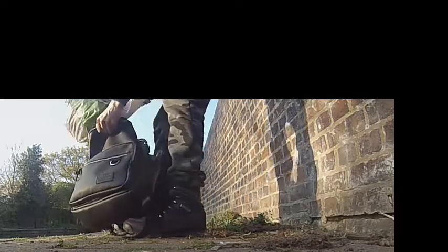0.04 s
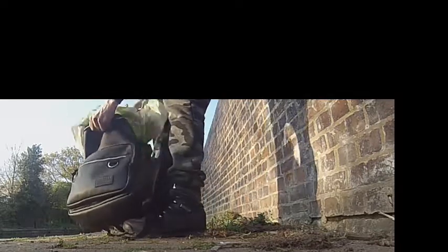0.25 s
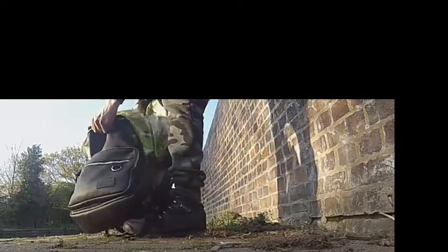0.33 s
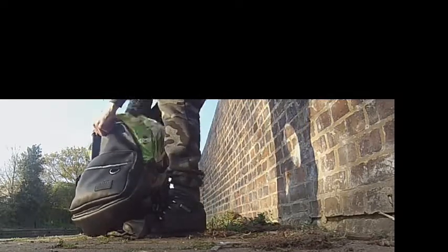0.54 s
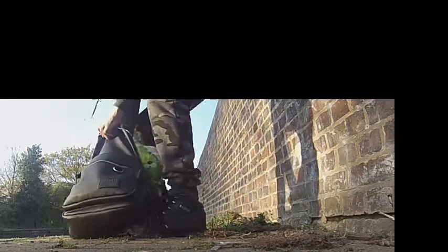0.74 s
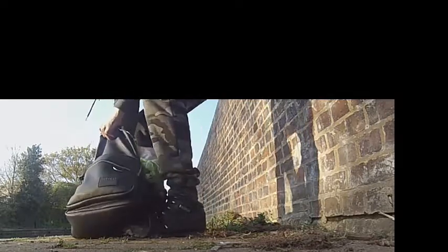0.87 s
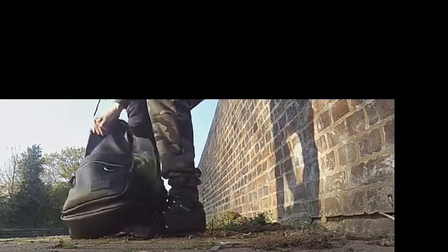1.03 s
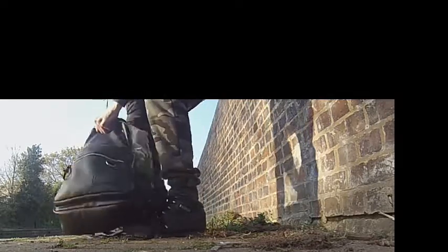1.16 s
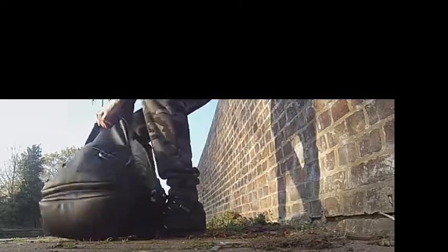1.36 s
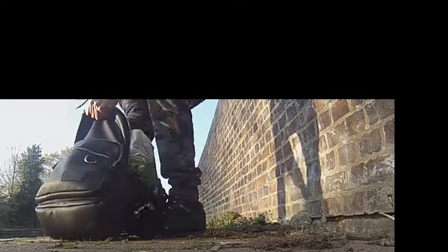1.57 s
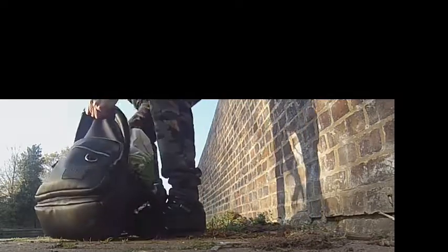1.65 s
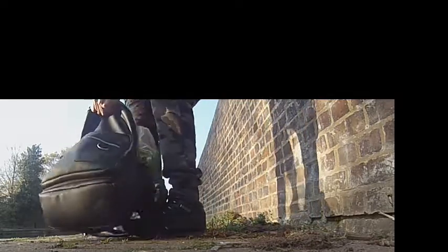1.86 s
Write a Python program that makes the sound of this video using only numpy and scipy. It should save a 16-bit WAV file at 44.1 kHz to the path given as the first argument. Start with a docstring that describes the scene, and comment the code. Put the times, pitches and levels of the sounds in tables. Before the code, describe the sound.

Crinkly thin cloth is stuffed into a bag on the ground, dry and close. Rough scraping swells early, peaks before one second, returns in shorter bouts with a stutter and small pops, then fades over faint outdoor noise.

```python
"""Outdoors, on the ground: a thin crinkly cover is stuffed into a fabric bag close to a small microphone.
Panel flexing (stick-slip pulses), weave scraping (ringing grains) and film crinkling (bursty hiss)
are shaped noises that follow one handling curve. Creases snap, a metal zip tab jingles, hollow pops
and dull knocks ring as dying sines, a seam judders to a stop; far outdoor noise lies under it."""
import sys
import numpy as np
from scipy import signal
from scipy.io import wavfile
from scipy.ndimage import uniform_filter1d

SR = 44100
rng = np.random.default_rng(int(sys.argv[2]) if len(sys.argv) > 2 else 0)


def master(y):
    """Save y as 16-bit WAV."""
    cut = np.clip(np.atleast_2d(y).T, -1, 1)
    pcm = np.round(cut * 32767)  # scale
    wavfile.write(sys.argv[1], SR, pcm.astype(np.int16))


def voltage_ratio(decibels):
    """Convert decibels (scalar or array-like) to amplitude ratios, 20 dB per decade."""
    exponent = np.asarray(decibels, float) / 20
    return 10 ** exponent


N = 83790  # length in samples

# Handling effort: (time [s], panel flexing level [dB], weave scraping level [dB], film crinkling level [dB])
HANDLING_CURVE = [(0, -42.5, -46.5, -53), (0.193, -52, -46.5, -78), (0.208, -33.5, -38.5, -45),
                  (0.259, -35.5, -38.5, -48), (0.282, -26.5, -24, -30), (0.327, -25.5, -24.5, -29.5),
                  (0.36, -29, -29.5, -31), (0.41, -33, -30.5, -33.5), (0.47, -35.5, -33.5, -41),
                  (0.55, -33, -31.5, -40.5), (0.6, -27, -25.5, -37), (0.629, -21, -22, -32),
                  (0.679, -19, -28, -37), (0.71, -27, -26.5, -38), (0.746, -22.5, -22.5, -35),
                  (0.76, -27, -28, -35.5), (0.795, -24, -27, -40), (0.805, -22, -30, -41.4),
                  (0.859, -20.5, -22.5, -36), (0.916, -23, -28, -39.5), (0.936, -36.5, -33, -42),
                  (0.985, -33.5, -38.5, -55), (1.02, -31, -34, -43), (1.1, -29.5, -27, -38),
                  (1.139, -30, -27.5, -36.5), (1.168, -33.5, -37, -49), (1.199, -28.5, -30.5, -41.5),
                  (1.29, -27.5, -27.5, -34), (1.32, -23, -25.5, -33), (1.377, -26, -27, -35),
                  (1.395, -37.5, -34, -40), (1.531, -37.5, -37, -53), (1.568, -30.5, -30.5, -43),
                  (1.59, -35, -37, -48.5), (1.64, -41, -39.5, -50), (1.665, -47, -49, -56),
                  (1.76, -50.5, -48.5, -62), (1.9, -43.5, -52, -76)]
# Spectrum of the flexing panels: (frequency [Hz], relative level per hertz [dB])
PANEL_SPECTRUM = [(35, -62), (60, -15.5), (108, -6.5), (190, -7.5), (389, -0.5), (740, -3), (1460, -11),
                  (2200, -19), (2860, -56.5)]
# Spectrum of the scraping weave: (frequency [Hz], relative level per hertz [dB])
WEAVE_SPECTRUM = [(650, -34), (1100, -3), (2470, -1.5), (3450, -3), (7040, -5), (9000, -12.5), (11700, -78)]
# Spectrum of the crinkling film: (frequency [Hz], relative level per hertz [dB])
FILM_SPECTRUM = [(4410, -21.5), (7500, -8), (9240, -9), (15300, -12.5)]
# Sharp creases snapping: (time [s], level [dB], centre frequency [Hz])
CREASE_SNAPS = [(0.052, -30, 6060), (.131, -33, 8500), (.237, -23, 8000), (.2955, -13, 4700),
                (0.6062, -14.5, 10500), (.7005, -12, 4870), (.735, -11, 4200), (0.745, -15, 6500),
                (0.75, -10, 5600), (0.8534, -5, 6400), (1.049, -22.5, 8900), (1.103, -21.5, 6000),
                (1.552, -21.5, 6900), (1.703, -33.5, 3000), (1.740, -32.5, 7000), (1.789, -28, 4950),
                (1.802, -40, 4300), (1.826, -30, 6060)]
# Zip tab tapping: (time [s], level [dB], lift of the upper modes [dB])
TAB_TAPS = [(0.07, -34, -4), (0.079, -27.5, 2), (.119, -30.5, -8), (0.124, -30, -1), (0.231, -25.5, 9),
            (.246, -29.5, 4), (1.442, -29, 10), (1.456, -25, 10), (1.468, -29.5, 16.5), (1.48, -23.5, 7.5),
            (1.499, -35, 16)]
# Modes of the zip tab: (nominal frequency [Hz], nominal level [dB], t60 [s])
TAB_MODES = [(4200, 4.5, .011), (5980, 0.5, 0.0057), (6800, -6, 0.008), (7800, -10.5, 0.0072)]
# Short hollow pops: (time [s], level [dB], frequency [Hz])
HOLLOW_POPS = [(1.432, -18, 2260), (1.484, -11.5, 2180)]
# Dull knocks and folds of the bag: (time [s], level [dB], frequency [Hz], time to fall 60 dB [cycles])
BAG_KNOCKS = [(.205, -20, 850, 16), (.270, -16.5, 430, 22), (.329, -13, 450, 6), (.739, -10, 520, 3),
              (.8005, -5, 500, 3), (1.3095, -8, 800, 12), (1.562, -15, 1200, 6), (1.7745, -15, 700, 4),
              (1.781, -21, 600, 3)]
# Spectrum of the far outdoor noise: (frequency [Hz], relative level per hertz [dB])
WASH_SPECTRUM = [(15, -57), (25, 2.5), (86, 8), (383, -2.5), (856, 4.5), (3540, -28), (15000, -29)]

WASH_DB = -41
STICK_PER_S = 210  # nominal pace at which the panels stick and let go
SNAP_T60_CYCLES, SNAP_SCATTER_T60_S = 19, 0.01
JUDDER_START_S, JUDDER_GAP_S, JUDDER_GAP_RATIO = 1.3527, 0.0054, 1.23
JUDDER_DB, JUDDER_HZ = -8, 1400
LEFT_CUT_HZ, EDGE_HZ = 78, 15600
HIT_T_S = np.arange(3000) / SR  # time axis of one hit


def evened(x):
    """Scale to unit rms."""
    return x / np.sqrt(np.mean(x ** 2) + 1e-20)


def colour(x, points):
    """Minimum-phase filter with the given spectrum, floored at -70 dB."""
    hz, db = np.transpose(points)
    bin_hz = abs(np.fft.fftfreq(8192, 1 / SR))
    gain_db = np.interp(np.log(bin_hz + 1), np.log(hz + 1), np.maximum(db, -70))
    log_gain = np.log(voltage_ratio(gain_db))
    phase = -signal.hilbert(log_gain).imag
    taps = np.fft.ifft(np.exp(log_gain + 1j * phase)).real[:4096]
    return signal.oaconvolve(x, taps)[:N]


def add(mix, start_s, sound):
    """Add a sound into the mix in place, cut at its end."""
    part = mix[round(start_s * SR):][:len(sound)]
    part += sound[:len(part)]


def handling_gain(column):
    """Gain from one column of the handling curve."""
    rows = np.array(HANDLING_CURVE)
    return voltage_ratio(np.interp(np.arange(N) / SR, rows[:, 0], rows[:, column]))


def slips(per_s, spread_db):
    """Random train of slips, mostly small, a few large."""
    size_db = spread_db * np.minimum(rng.exponential(1, N), 4)
    return voltage_ratio(size_db) * (rng.random(N) < per_s / SR)


def grains(train, lo_hz, hi_hz, cycles, count=24):
    """Each slip rings one of many small patches, each with its own pitch; cycles = decay to 1/e."""
    patch = rng.integers(0, count, N)
    out = np.zeros(N)
    for k, hz in enumerate(np.geomspace(lo_hz, hi_hz, count)):
        turns = np.arange(0, 4 * cycles, hz / SR)
        grain = np.cos(2 * np.pi * turns) * np.exp(-turns / cycles)
        out += signal.oaconvolve(train * (patch == k), grain / np.linalg.norm(grain))[:N]
    return evened(out)


def flutter(smooth_s, depth_db):
    """Random gain from twice-smoothed noise; depth_db is its rms swing."""
    width = int(smooth_s * SR) + 1
    drift = uniform_filter1d(rng.standard_normal(N), width)
    drift = uniform_filter1d(drift, width)
    return voltage_ratio(depth_db * evened(drift))


def ring(hz, t60_s, rise_s):
    """Dying sine with a soft start."""
    decay = voltage_ratio(-60 * HIT_T_S / t60_s)
    return np.sin(2 * np.pi * hz * HIT_T_S) * decay * np.minimum(HIT_T_S / rise_s, 1)


def panel_flexing(jolt, hiss):
    """Stick-slip: one pulse of random size per turn of an unsteady clock, plus jolts and hiss."""
    turns = np.cumsum(STICK_PER_S * flutter(smooth_s=0.004, depth_db=3.5)) / SR
    push = np.diff(np.floor(turns), prepend=0) * voltage_ratio(2.33 * rng.standard_normal(N))
    return evened(push - push.mean()) + 0.15 * jolt + 0.7 * hiss


def weave_scraping(jolt, hiss):
    """Dense slips ring small patches of weave, plus jolts and hiss."""
    scrape = grains(slips(per_s=2200, spread_db=2.4), lo_hz=1200, hi_hz=8000, cycles=1.6)
    return scrape + 0.25 * jolt + 0.55 * hiss


def film_crinkling(shared, jolt, hiss):
    """Hiss that bursts at each shared slip and dies away (0.95 ms to 1/e), plus jolts."""
    burst = evened(signal.lfilter([1], [1, -np.exp(-1 / (0.00095 * SR))], shared))
    return 0.26 * jolt + (1 + 0.5 * burst) * hiss


def cloth():
    """Three textures share the slips and the flutter of the contact pressure."""
    shared = slips(per_s=200, spread_db=3.0)
    pressure = flutter(smooth_s=0.0048, depth_db=1.1)
    panel_hiss, weave_hiss, film_hiss = rng.standard_normal((3, N))
    jolt = evened(shared - shared.mean())
    panel = evened(pressure * colour(panel_flexing(jolt, panel_hiss), PANEL_SPECTRUM))
    weave = evened(pressure * colour(weave_scraping(jolt, weave_hiss), WEAVE_SPECTRUM))
    film = evened(pressure * colour(film_crinkling(shared, jolt, film_hiss), FILM_SPECTRUM))
    return handling_gain(1) * panel + handling_gain(2) * weave + handling_gain(3) * film


def snaps():
    """Each crease rings briefly at its pitch under a dying noise band, mostly below that pitch."""
    out = np.zeros(N)
    for start_s, db, hz in CREASE_SNAPS:
        band = signal.butter(1, [0.27 * hz, min(1.03 * hz, 15500)], "band", fs=SR)
        noise = signal.lfilter(*band, rng.standard_normal(len(HIT_T_S)))
        scatter = evened(noise) * voltage_ratio(-60 * HIT_T_S / SNAP_SCATTER_T60_S)
        tone = ring(hz, SNAP_T60_CYCLES / hz, rise_s=0.0001)
        add(out, start_s, voltage_ratio(db) * (1.13 * tone + 0.5 * scatter))
    return out


def zip_tab():
    """Each tap is a brief rattle of bounces that excites the metal modes, slightly varied."""
    out = np.zeros(N)
    bounce = np.arange(400)  # samples
    for start_s, db, lift_db in TAB_TAPS:
        level_shift, pitch_shift = rng.standard_normal((2, len(TAB_MODES)))
        modes = np.zeros(len(HIT_T_S))
        for k, (hz, mode_db, t60_s) in enumerate(TAB_MODES):
            tap_db = mode_db + lift_db * (k > 0) + 1.5 * level_shift[k]
            tap_hz = hz * (1 + 0.014 * pitch_shift[k])
            modes += voltage_ratio(tap_db) * ring(tap_hz, t60_s, rise_s=0.00037)
        rattle = rng.standard_normal(len(bounce)) * np.exp(-bounce / (0.003 * SR))
        add(out, start_s, voltage_ratio(db) * np.convolve(modes, rattle / np.linalg.norm(rattle)))
    return out


def pops():
    """Hollow pops: short soft-edged sines."""
    out = np.zeros(N)
    for start_s, db, hz in HOLLOW_POPS:
        add(out, start_s, voltage_ratio(db) * ring(hz, t60_s=0.013, rise_s=0.00085))
    return out


def knocks():
    """Knocks and folds: low dying sines that swing negative first."""
    out = np.zeros(N)
    for start_s, db, hz, cycles in BAG_KNOCKS:
        add(out, start_s, -voltage_ratio(db) * ring(hz, cycles / hz, rise_s=0.3 / hz))
    return out


def judder(count=5):
    """A seam stops in a few hard, short slips, each gap longer than the last."""
    out = np.zeros(N)
    slip = voltage_ratio(JUDDER_DB) * ring(JUDDER_HZ, 3 / JUDDER_HZ, rise_s=0.0001)
    for k in range(count):
        late_s = JUDDER_GAP_S * (JUDDER_GAP_RATIO ** k - 1) / (JUDDER_GAP_RATIO - 1)
        add(out, JUDDER_START_S + late_s, slip)
    return out


def scattered(near):
    """Short scatter from the wall and the ground: sparse random echoes after 2 ms, t60 60 ms."""
    t = np.arange(2600) / SR
    echoes = rng.choice([-1., 1.], len(t)) * (rng.random(len(t)) < 0.05) * (t > 0.002)
    tail = echoes * voltage_ratio(-60 * t / 0.06)
    return voltage_ratio(-12) * signal.oaconvolve(near, tail / np.linalg.norm(tail))[:N]


def wash():
    """Far outdoor noise: coloured noise, gently lumpy."""
    noise = colour(rng.standard_normal(N), WASH_SPECTRUM)
    return voltage_ratio(WASH_DB) * evened(noise * flutter(smooth_s=0.0075, depth_db=2.0))


def scene():
    """Near sounds with their scatter, over the wash; the same in both channels."""
    near = cloth() + snaps() + zip_tab() + pops() + knocks() + judder()
    mono = near + scattered(near) + wash()
    return np.array([mono, mono])


def top_cut(x):
    """Nothing passes above the cut-off."""
    return signal.sosfilt(signal.butter(12, 16330, fs=SR, output="sos"), x)


def record(dry):
    """One capsule into two inputs: the left loses more bass, both are band-limited."""
    left = signal.lfilter(*signal.butter(1, LEFT_CUT_HZ, "high", fs=SR), dry[0])
    edge = signal.firwin(255, EDGE_HZ, window=("kaiser", 7), fs=SR)[None]
    mix = signal.oaconvolve(np.array([left, dry[1]]), edge, "same")
    return top_cut(mix)


dry = scene()
out = record(dry)
master(out)
```